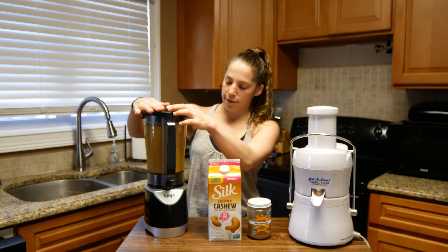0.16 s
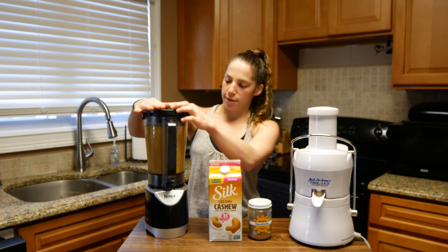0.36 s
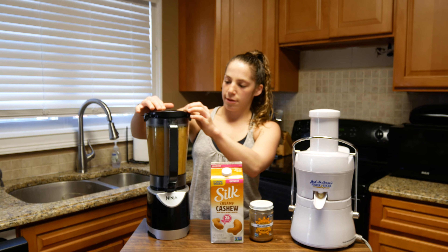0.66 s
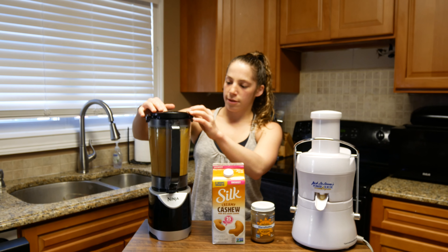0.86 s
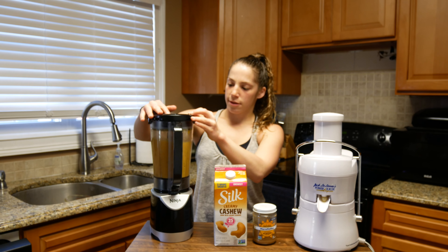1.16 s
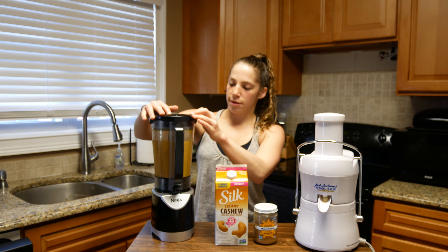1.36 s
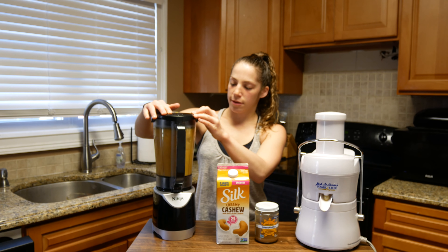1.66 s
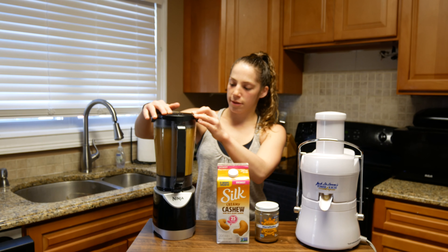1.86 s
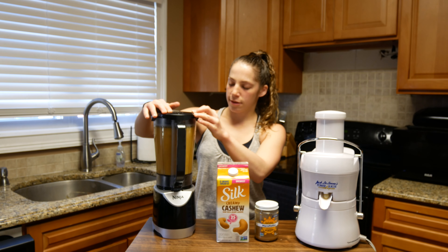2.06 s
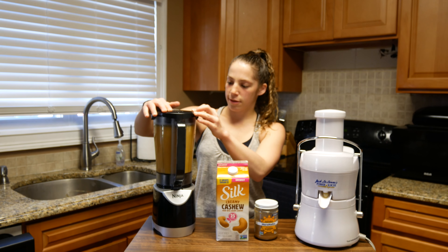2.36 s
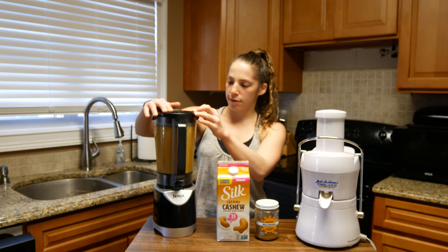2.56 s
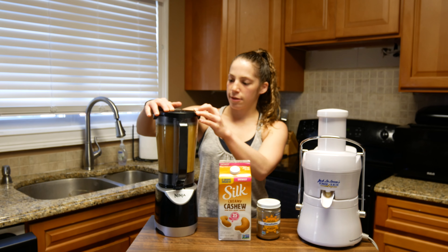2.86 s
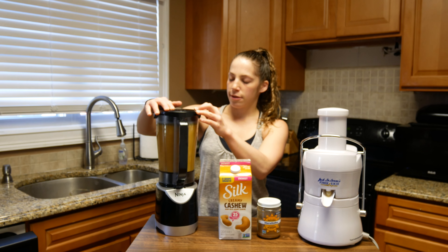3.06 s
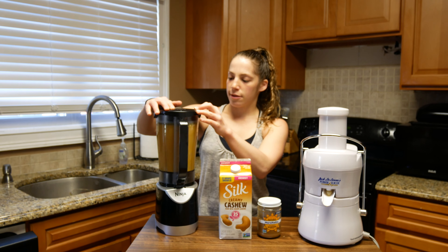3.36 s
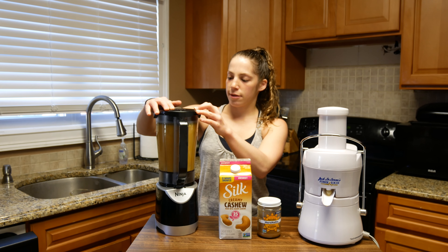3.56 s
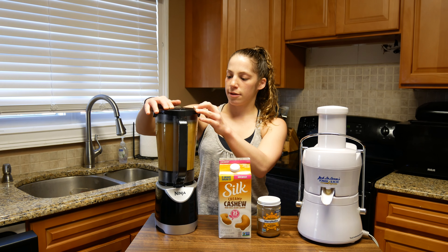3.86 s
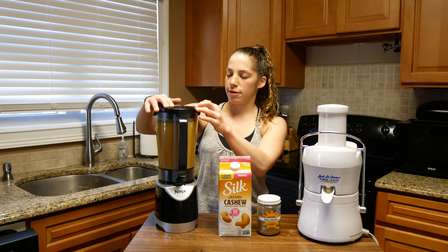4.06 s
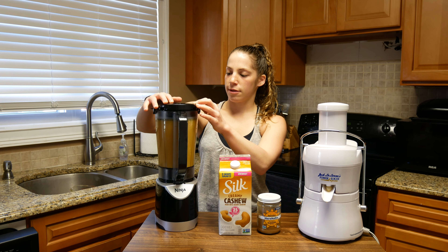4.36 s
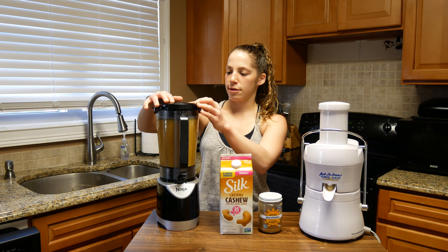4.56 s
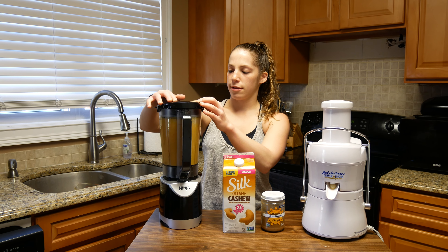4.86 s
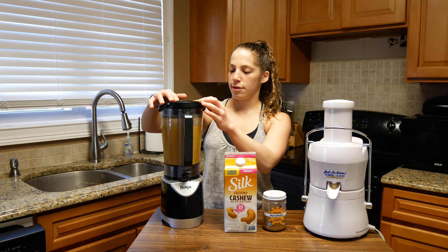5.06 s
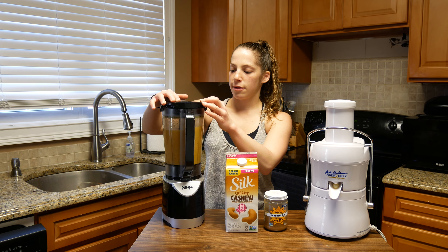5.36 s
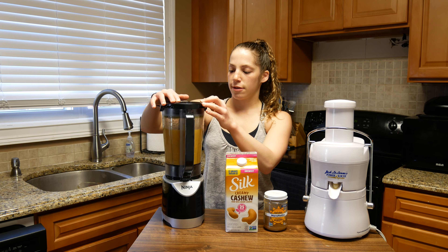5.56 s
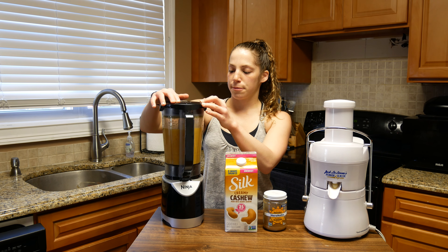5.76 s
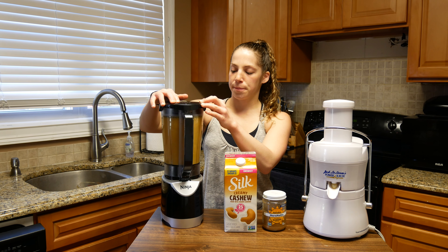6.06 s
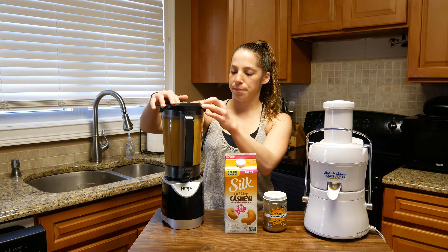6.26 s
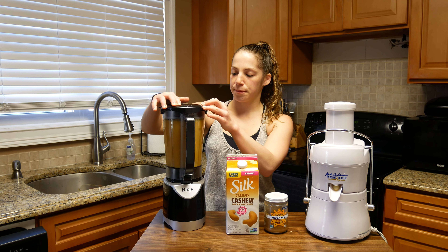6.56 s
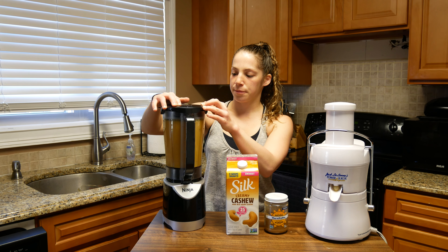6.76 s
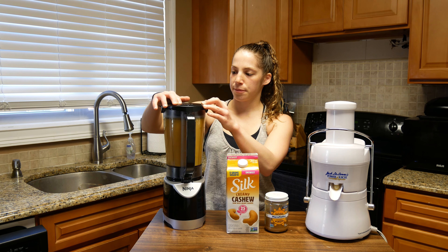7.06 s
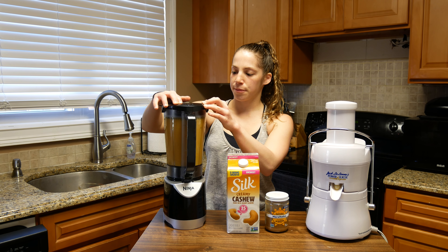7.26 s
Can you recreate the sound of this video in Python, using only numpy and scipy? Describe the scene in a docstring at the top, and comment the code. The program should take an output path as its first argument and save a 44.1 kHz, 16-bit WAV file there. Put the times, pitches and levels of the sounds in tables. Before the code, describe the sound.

A countertop blender crushes ice and fruit in three pulses, whining and rattling, coasting down between them with cracking lumps and soft glugs.

```python
"""A blender already at full tilt on a kitchen counter, close to a microphone pair, is heard first.
Three pulses crush ice and fruit: blades chip ice and churn slurry, gears whine and rattle, the jar booms.
Between pulses the motor coasts down, last lumps crack and the smoothie settles with soft glugs.
Click showers through spectra and resonances make the crushing and rattle; sine tones make the whine.
Tiles and cupboards give the reflections, over soft room air and a low hum."""
import sys
import numpy as np
from scipy import signal
from scipy.fft import rfft, irfft, next_fast_len
from scipy.io import wavfile
from scipy.ndimage import uniform_filter1d

SR = 44100
rng = np.random.default_rng(int(sys.argv[2]) if len(sys.argv) > 2 else 0)


def dump(signal):
    """Clip the signal to [-1, 1] and save it as 16-bit WAV at the path in sys.argv[1]."""
    limited = np.clip(np.atleast_2d(signal).T, -1, 1)
    pcm = np.round(limited * 32767).astype(np.int16)
    wavfile.write(sys.argv[1], SR, pcm)


N = 327663
TIME = np.arange(N) / SR


def amp(db):
    """Decibels to gain."""
    return 10 ** (np.asarray(db) / 20)


def evened(x):
    """Scales to rms 1."""
    return x / np.sqrt(np.mean(x ** 2) + 1e-20)


def curves(rows):
    """Each column of a timed table, sample by sample."""
    s, *columns = np.transpose(rows)
    return [np.interp(TIME, s, c) for c in columns]


def read(points, hz):
    """Reads a spectrum table on a log-frequency axis."""
    f, value = np.transpose(points)
    return np.interp(np.log(hz + 1), np.log(f + 1), value)


def add(mix, s, sound):
    """Mixes a sound in at time s."""
    part = mix[max(round(s * SR), 0):][:len(sound)]
    part += sound[:len(part)]


def coloured(x, spectrum, size=4096):
    """Minimum-phase filter of unit energy with the given spectrum."""
    log_gain = np.log(amp(read(spectrum, abs(np.fft.fftfreq(size, 1 / SR)))))
    response = np.exp(np.conj(signal.hilbert(log_gain)))
    taps = np.fft.ifft(response).real[:size // 2]
    return signal.oaconvolve(x, taps / np.linalg.norm(taps))[:len(x)]


def resonate(x, hz, width):
    """A two-pole resonance that can follow a moving frequency."""
    turn = np.exp(2j * np.pi * np.cumsum(hz * np.ones(len(x))) / SR)
    r = np.exp(-np.pi * width / SR)
    # shift the band down to 0 Hz, smooth it there and shift it back
    smoothed = signal.lfilter([(1 - r) ** 2], [1, -2 * r, r * r], x / turn + 1e-18)
    return 2 * (turn * smoothed).real


def waver(per_s):
    """Random values, per_s each second, joined by straight lines; rms 1."""
    knots = rng.standard_normal(N // 20)
    return evened(np.interp(TIME * per_s, np.arange(len(knots)), knots))


def clicks(per_s, spread_db):
    """Random clicks, many small and a few large; rms 1."""
    size = amp(spread_db * np.minimum(rng.exponential(1, N), 4.5))
    struck = rng.random(N) < per_s / SR
    return evened(size * rng.choice([-1, 1], N) * struck)


def swell(s, half_length):
    """A smooth rise and fall around time s."""
    return np.exp(-((TIME - s) / half_length) ** 2)


CHIP_DB = -29  # steady ice chipping at full speed, before colouring

# Lumps dragged through the blades or sliding down the wall:
# (time [s], half length [s], ice level [dB], slurry level [dB])
PASSING_LUMPS = [(0.0, 0.038, -27.5, -24.5), (0.177, 0.072, -30, -35), (0.451, 0.032, -38.5, -26),
                 (0.619, 0.02, -35, -24.5), (0.874, 0.054, -39.5, -28), (0.951, 0.036, -32, -31.5),
                 (1.273, 0.05, -71, -47.5), (1.496, 0.021, -58, -52), (1.718, 0.03, -25.5, -40),
                 (1.819, 0.03, -28.5, -52), (2.016, 0.073, -29, -28), (2.304, 0.04, -32.5, -33.5),
                 (2.836, 0.047, -27, -48), (3.362, 0.041, -33, -32), (3.69, 0.081, -35.5, -50),
                 (3.903, 0.035, -33, -26.5), (4.707, 0.04, -35.5, -33), (4.862, 0.038, -27.5, -30),
                 (5.057, 0.037, -68, -48), (5.443, 0.047, -58.5, -66), (6.124, 0.06, -34, -26),
                 (6.382, 0.11, -29, -54), (6.981, 0.069, -33, -49), (7.286, 0.046, -32, -30.5)]


def lumps():
    """Strength of the ice and of the slurry in the passing lumps."""
    return sum(amp([[ice_db], [slurry_db]]) * swell(s, half)
               for s, half, ice_db, slurry_db in PASSING_LUMPS)


# Spin-up: a quick leap, a slower share held back by the slurry, then a creep as the mix thins
LEAP_S, DRAG_S, DRAG_SHARE, CREEP_TURNS_PER_S2 = 0.027, 0.23, 0.408, 0.45
# Friction brakes the blades almost evenly; a lump as loud as the steady chipping slows them by this share
COAST_POWER, LUMP_SAG = 1.1, 0.005
# The motor is switched on and off:
# (on [s], off [s], working speed before creep and sag [turns/s], coasting time [s])
MOTOR_PULSES = [(-1.3, 0.4, 48.1, 0.64), (1.63, 4.3, 48.17, 0.7), (5.92, 7.6, 48.48, 0.7)]


def motor(ice_lumps):
    """Blade turns per second: each pulse spins up, sags on lumps and coasts after switch-off."""
    speed = np.zeros(N)
    for on, off, working, coast in MOTOR_PULSES:
        age = np.clip(TIME - on, 0, off - on)
        lag = (1 - DRAG_SHARE) * np.exp(-age / LEAP_S) + DRAG_SHARE * np.exp(-age / DRAG_S)
        braking = np.clip(1 - (TIME - off) / coast, 0, 1) ** COAST_POWER
        speed += (working * (1 - lag) + CREEP_TURNS_PER_S2 * age) * braking
    return speed * (1 - LUMP_SAG * ice_lumps / amp(CHIP_DB))


# Churning level at full speed, and the powers of the speed that chipping and churning follow
CHURN_DB, CHIP_POWER, CHURN_POWER = -30.5, 1, 0.54
# At each start the blades take hold and throw the resting load about
GRIP_S, KICK_S, KICK_CHIP_DB, KICK_CHURN_DB = 0.011, 0.11, -32, -26.5
# Settling slurry after each pulse, its fade once the blades stand, and the slush fizz relative to it
SETTLE_DB, SETTLE_DB_PER_S, FIZZ_DB = [-44, -49.5, -48], 36.5, -5


def work(speed, ice_lumps, slurry_lumps):
    """Chipping and churning strength: a kick at each start, then the speed, then settling."""
    share = speed / speed.max()
    grip, kick, settling = np.zeros((3, N))
    for (on, off, _, coast), settle_db in zip(MOTOR_PULSES, SETTLE_DB):
        age = np.maximum(TIME - on, 0)
        rest = np.maximum(TIME - off - coast, 0)
        grip += np.minimum(age / GRIP_S, 1) ** 2 * (rest == 0)
        kick += np.exp(-age / KICK_S) * (age > 0)
        settling += amp(settle_db - SETTLE_DB_PER_S * rest) * (TIME > off)
    chip = grip * (amp(CHIP_DB) * share ** CHIP_POWER + amp(KICK_CHIP_DB) * kick)
    churn = grip * (amp(CHURN_DB) * share ** CHURN_POWER + amp(KICK_CHURN_DB) * kick)
    fizz = amp(FIZZ_DB) * settling
    return (np.sqrt(chip ** 2 + ice_lumps ** 2 + fizz ** 2),
            np.sqrt(churn ** 2 + slurry_lumps ** 2 + settling ** 2))


# Spectrum of chipped ice: (frequency [Hz], relative density [dB per Hz])
CHIP_SPECTRUM = [(900, -40), (1450, -8.5), (1750, 1.5), (2200, 0.5), (2850, 2.5), (3100, -2), (4000, -2.5),
                 (5400, -4.5), (7000, -5), (8200, -5.5), (9800, -5), (11500, -7.5), (13500, -14),
                 (15500, -24.5)]
# Spectrum of beaten slurry: (frequency [Hz], relative density [dB per Hz])
SLURRY_SPECTRUM = [(40, -36), (110, -44), (170, -13), (260, 4), (430, -0.5), (540, -2), (650, 1.5),
                   (880, 2.5), (1020, -1), (1150, 2.5), (1450, -3.5), (2200, -2), (3500, -5), (8000, -20.5)]


def blades(chip, churn, turns, sweep=0.034, clump_db=1.0, surge_db=1.0, drift_db=0.05):
    """Blades chip ice and beat the slurry in click showers, hardest once a turn."""
    passing = (1 + sweep * np.cos(2 * np.pi * turns)) * amp(drift_db * waver(11))
    clumps = waver(55)
    chips = evened(clicks(6000, 2.1) + 0.38 * clicks(260, 2.45))
    chipping = chips * passing * chip * amp(clump_db * clumps)
    churning = clicks(2000, 2.8) * passing * churn * amp(surge_db * clumps)
    return amp(3.5) * coloured(chipping, CHIP_SPECTRUM) + amp(1.5) * coloured(churning, SLURRY_SPECTRUM)


# Jar resonances: (frequency [Hz], width [Hz], relative level [dB])
JAR_MODES = [(192, 40, -13), (241.3, 24.3, -1.5), (281, 16.8, 1.5)]


def jar(speed, turns, unevenness=0.6, tumble=0.75, stiffness=0.75):
    """Slurry slaps the wall once a turn and tumbles in between; the jar booms."""
    slaps = np.diff(np.floor(turns), prepend=0) * (1 + unevenness * rng.standard_normal(N))
    push = evened(slaps) + tumble * clicks(1500, 1.0)
    boom = evened(sum(amp(db) * evened(resonate(push, hz, width)) for hz, width, db in JAR_MODES))
    swing = abs(uniform_filter1d(boom ** 2, SR // 20))
    boom = evened(boom / np.sqrt(1 + (2 * stiffness) ** 2 * swing))  # keeps a fairly even level
    stirred = np.tanh((speed / 17) ** 2)  # shaken as long as the blades sweep the slurry round
    return amp(-37.5) * boom * stirred


TEETH = 48
# Rattle level at full speed, and the power of the speed that it follows
RATTLE_DB, RATTLE_POWER = -27, 1.3
# Unloaded teeth whirr while coasting: level, band width, and the speed (turns/s) under which it dies
WHIRR_DB, WHIRR_WIDTH_HZ, WHIRR_SPEED = -35.5, 210, 13.5
# Tooth rattle bands: (multiple of the mesh rate [1], width [Hz], relative level [dB])
RATTLE_BANDS = [(1, 280, -4.5), (2, 470, -7), (3, 800, -10.5)]
# Housing resonances: (frequency [Hz], width [Hz], relative level [dB])
HOUSING_MODES = [(1580, 10, 1), (1938, 23, 3), (2172, 68, 10.5), (2600, 84, -13.5), (2670, 23, 5),
                 (2960, 38, 5)]
# Short fits of gear chatter: (time [s], half length [s], level [dB])
CHATTER_FITS = [(0.508, 0.068, -30), (2.094, 0.1, -44), (4.164, 0.068, -38), (6.043, 0.04, -19),
                (6.224, 0.033, -23)]


def rattle(speed, ragged_db=6.0, bounce=0.081, whirr_bounce=0.073):
    """Gear teeth chatter in bands that glide with the speed and shake the housing."""
    share = speed / speed.max()
    pull = np.tanh(np.gradient(speed, TIME) / 30)  # +1 speeding up, -1 coasting
    slowing = np.maximum(-pull, 0)
    # while the speed changes the teeth bounce in their backlash, unevenly in pitch and level
    mesh_hz, backlash = TEETH * speed, pull * waver(90)
    ragged = amp(ragged_db * abs(pull) * (waver(40) - 0.5))
    chatter = clicks(4000, 1.3)
    teeth = sum(amp(db) * evened(resonate(chatter, round(k) * mesh_hz * (1 + bounce * backlash), width))
                for k, width, db in RATTLE_BANDS)
    whirr_hz = mesh_hz * (1 + whirr_bounce * backlash)
    whirr = evened(resonate(clicks(2500, 4.3), whirr_hz, WHIRR_WIDTH_HZ))
    housing = sum(amp(db) * evened(resonate(chatter, hz, width)) for hz, width, db in HOUSING_MODES)
    fits = sum(amp(db) * swell(s, half) for s, half, db in CHATTER_FITS)
    driven = np.hypot(amp(RATTLE_DB) * share ** RATTLE_POWER * (1 - slowing / 2), fits / 2)
    loose = np.hypot(amp(WHIRR_DB) * np.tanh((speed / WHIRR_SPEED) ** 3) * slowing, fits)
    return ragged * (driven * teeth + loose * whirr) + amp(-46) * housing * share ** 2


# The gears sing out only near full speed: middle and width (turns/s) of the step, level when below it
SING_SPEED, SING_WIDTH, LOADED_DB = 46.8, 0.48, -10
# Tooth mesh and off-centre wobble at full speed before the swell, and the power of the speed they follow
MESH_DB, WOBBLE_DB, WHINE_POWER = -34.5, -38, 0.72
# Tooth mesh tones: (multiple of the blade speed [1], relative level [dB])
MESH_TONES = [(44, -23), (48, 5), (52, -31), (56, -3), (60, -14), (96, -12), (144, -28)]
# Off-centre wobble tones: (multiple of the blade speed [1], relative level [dB])
WOBBLE_TONES = [(45, -8), (49, -2), (53, -3), (93, -14), (97, -11)]
# Shaft tones: (multiple of the blade speed [1], relative level [dB])
SHAFT_TONES = [(5, -2.5), (6, -43), (7, -2), (10, 2.5), (12, -15.5)]
# The whine slowly swells and fades: (time [s], relative level [dB])
WHINE_LEVEL = [(0, -4.5), (2.3, -2.5), (2.7, -7.5), (3.2, -2), (3.7, -12), (4.25, 0), (6.5, -8.5),
               (6.85, 0), (7.43, -5)]


def whine(speed, turns, slack_turns=0.00024):
    """Clean gear and shaft tones at multiples of the blade speed; backlash makes their pitch flutter."""
    swell_db, = curves(WHINE_LEVEL)
    share = speed / speed.max()
    loaded = (1 - np.tanh((speed - SING_SPEED) / SING_WIDTH)) / 2
    singing = amp(swell_db + LOADED_DB * loaded) * share ** WHINE_POWER
    angle = 2 * np.pi * (turns + slack_turns * waver(45))
    families = [(MESH_TONES, amp(MESH_DB) * singing), (WOBBLE_TONES, amp(WOBBLE_DB) * singing),
                (SHAFT_TONES, amp(-49.5) * share ** 2)]
    return np.sqrt(2) * sum(level * amp(db) * np.sin(round(k) * angle + 2 * np.pi * rng.random())
                            for orders, level in families for k, db in orders)


# Lumps of ice break: (time [s], relative level [dB], crumbling time [s])
ICE_BREAKS = [(0.617, -40, 0.017), (0.697, -13, 0.006), (0.704, -21, 0.054), (0.806, -22, 0.0065),
              (0.863, -23, 0.0044), (0.95, -42, 0.0063), (1.121, -35.5, 0.01), (1.479, -46, 0.0045),
              (1.641, -20, 0.01), (1.662, -13, 0.0092), (1.725, -11, 0.0062), (3.445, -42, 0.0048),
              (4.287, -28, 0.0038), (4.527, -25, 0.0062), (4.678, -25, 0.056), (4.846, -32, 0.025),
              (4.861, -24, 0.011), (4.938, -28.5, 0.037), (5.949, -16, 0.0075)]
# Spectrum of breaking ice: (frequency [Hz], relative level [dB])
BREAK_SPECTRUM = [(100, -45), (300, -25), (900, 9), (1500, 10), (2700, 15.5), (4200, 8), (6500, 4),
                  (10000, -1), (15500, -13)]


def ice(snap=6.6):
    """Each lump snaps once and crumbles in a quick shower of chips."""
    shower, snaps, t = np.zeros(N), np.zeros(N), TIME[:SR // 4]
    for s, db, crumble in ICE_BREAKS:
        add(shower, s, amp(db) * np.exp(-t / crumble))
        add(snaps, s, amp([db]) * snap)
    return coloured(shower * clicks(9000, 3.2) + snaps, BREAK_SPECTRUM)


# Lid ring: (frequency [Hz], relative level [dB], time to fall 60 dB [s])
LID_MODES = [(1150, -8, 0.75), (1143, -16, 0.2), (1211, 7.5, 0.084), (2036, -15, 0.061), (2010, -14, 0.12)]
# The lid seats, shifts or lets go: (time [s], relative level [dB])
LID_CLACKS = [(0.002, -23.5), (0.455, -28), (1.382, -52), (1.659, -23.5), (4.286, -22), (5.374, -48),
              (5.913, -40)]


def lid(buzz_time=0.015, buzz_hz=1450, buzz_width=1300):
    """The plastic lid buzzes in its seat and rings briefly when it is pressed or released."""
    out, t = np.zeros(N), TIME[:SR // 3]
    ring = sum(amp(db - 60 * t / t60) * np.sin(2 * np.pi * hz * t) for hz, db, t60 in LID_MODES)
    for s, db in LID_CLACKS:
        buzz = evened(resonate(rng.standard_normal(len(t)), buzz_hz, buzz_width))
        add(out, s, amp(db) * (0.85 * ring + buzz * np.exp(-t / buzz_time)))
    return out


# The smoothie slumps and lets air out: (time [s], relative level [dB], frequency [Hz], length [s])
AIR_POCKETS = [(0.853, -32, 720, 0.0082), (0.872, -39, 650, 0.0077), (0.922, -24, 1150, 0.011),
               (1.22, -48, 1700, 0.014), (1.239, -39.5, 422, 0.02), (1.298, -43, 350, 0.02),
               (1.372, -44, 1290, 0.014), (1.381, -38, 350, 0.0062), (1.462, -46, 320, 0.014),
               (1.513, -47, 300, 0.0068), (1.646, -23.5, 550, 0.024), (5.12, -45, 1110, 0.011),
               (5.196, -43.5, 640, 0.013), (5.286, -52.5, 3000, 0.02), (5.364, -51, 1330, 0.012),
               (5.37, -38.5, 383, 0.019), (5.55, -50.5, 2950, 0.011), (5.613, -48, 1500, 0.013),
               (5.922, -23.5, 424, 0.023)]


def glugs(breadth=0.54):
    """Clusters of small pops ring air pockets in the thick smoothie."""
    out, t, pops = np.zeros(N), TIME[:SR // 5], clicks(3500, 1.17)
    for s, db, hz, length in AIR_POCKETS:
        band = signal.butter(1, hz * np.exp([-breadth, breadth]), "bandpass", fs=SR)
        cluster = pops[round(s * SR):][:len(t)]
        pocket = evened(signal.lfilter(*band, signal.lfilter(*band, cluster)))
        # the envelope peaks at half the length
        add(out, s, amp(db) * pocket * (2 * t / length) * np.exp(1 - 2 * t / length))
    return out


def kitchen(x, count=4):
    """Lumps strike all round the jar, so the paths into the room keep changing."""
    shares = np.array([waver(30) for _ in range(count)])
    return sum(echoes(x * share) for share in shares / np.linalg.norm(shares, axis=0))


# Decay of the small kitchen: (frequency [Hz], time to fall 60 dB [s])
ROOM_DECAY = [(150, 0.31), (600, 0.53), (2500, 0.35), (7000, 0.34), (15000, 0.18)]


def echoes(x, size=20):
    """Dense reflections off tiles and cupboards, each band dying at its own speed."""
    taps = np.zeros(SR // 2)
    at = np.arange(4 * size, len(taps) - size, size)
    taps[at + rng.integers(0, size, len(at))] = rng.choice([-1., 1.], len(at))
    hz, t, z = signal.stft(taps, SR, nperseg=256)
    decay = amp(-60 * t / read(ROOM_DECAY, hz)[:, None])
    tail = signal.istft(z * decay, SR, nperseg=256)[1]
    return signal.oaconvolve(x, tail / np.linalg.norm(tail))[:N]


# Spectrum of the room air: (frequency [Hz], relative level [dB])
AIR_SPECTRUM = [(25, -28), (52, -28), (75, 0), (150, 1.5), (280, 10.5), (450, 4), (1100, -3), (1700, -10),
                (4000, -16.5), (8000, -20.5), (11000, -24), (15500, -43)]
# Household appliances hum: (frequency [Hz], rms level [dB])
HUM_TONES = [(75.4, -71.5), (119.5, -78), (241, -59.5), (312, -62)]


def background():
    """Soft room air from coloured noise, with a low hum of steady tones."""
    hum = sum(amp(db) * np.sin(2 * np.pi * (hz * TIME + rng.random())) for hz, db in HUM_TONES)
    return amp(-51.0) * coloured(rng.standard_normal(N), AIR_SPECTRUM) + np.sqrt(2) * hum


# Stereo width: (frequency [Hz], side gain [dB])
SIDE_GAIN = [(60, -0.5), (150, -8), (300, -14.5), (700, -8.5), (2500, -9), (5000, -6), (9000, -5.5),
             (14000, 1.5)]
# Stereo lean: (frequency [Hz], left minus right [dB])
LEFT_LEAN = [(150, 0), (650, -2.5), (1400, -1.2), (5000, 0.9), (9000, -1.4), (14000, -0.3)]


def scene(low_cut_hz=110):
    """The blender stands ahead of a close microphone pair; reflections and room air give the width."""
    ice_lumps, slurry_lumps = lumps()
    speed = motor(ice_lumps)
    chip, churn = work(speed, ice_lumps, slurry_lumps)
    turns = np.cumsum(speed) / SR
    crush = blades(chip, churn, turns) + jar(speed, turns) + rattle(speed) + ice() + lid() + glugs()
    small_body = signal.butter(2, low_cut_hz, "highpass", fs=SR)  # a small jar radiates little bass
    crush, tones = signal.lfilter(*small_body, [crush, whine(speed, turns)])
    air = background()
    direct = amp(-0.5) * crush + amp(1.5) * tones
    mid = direct + amp(-5.0) * kitchen(crush) + amp(-6) * echoes(tones) + air
    side = amp(-2.5) * (kitchen(crush) + echoes(tones + air))
    size = next_fast_len(N)
    hz = np.fft.rfftfreq(size, 1 / SR)
    mid = rfft(mid, size)
    side = rfft(side, size) * amp(read(SIDE_GAIN, hz))
    lean = amp(read(LEFT_LEAN, hz) / 2)
    return irfft(np.array([(mid + side) * lean, (mid - side) / lean]), size)[:, :N]


NOTCH_HZ, EDGE_HZ = 7890, 15600


def record(dry, notch_q=32):
    """The recorder rounds off peaks, has one narrow treble notch and a steep band limit."""
    ceiling = 0.8
    rounded = ceiling * np.tanh(dry / ceiling)
    notched = signal.lfilter(*signal.iirnotch(NOTCH_HZ, notch_q, SR), rounded)
    edge = signal.firwin(511, EDGE_HZ, window=("kaiser", 9), fs=SR)
    return signal.oaconvolve(notched, edge[None], "same")


dry = scene()
out = record(dry)
dump(out)
```